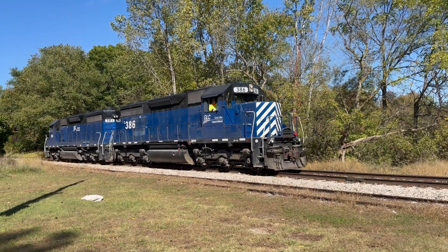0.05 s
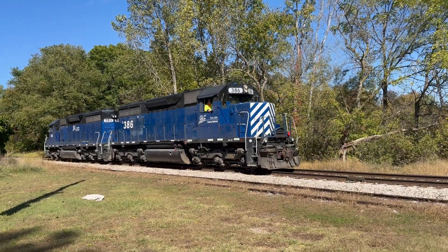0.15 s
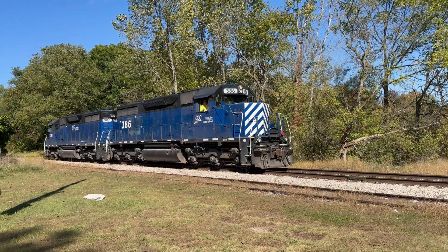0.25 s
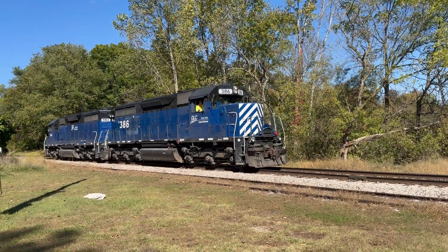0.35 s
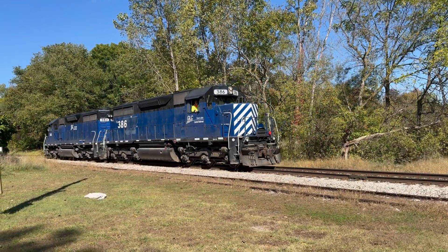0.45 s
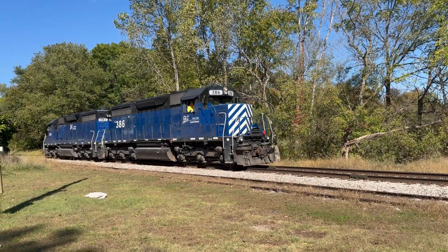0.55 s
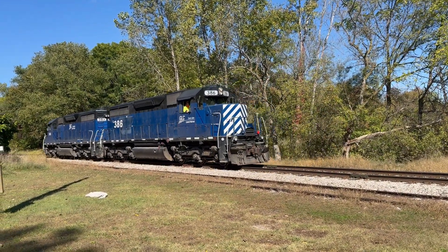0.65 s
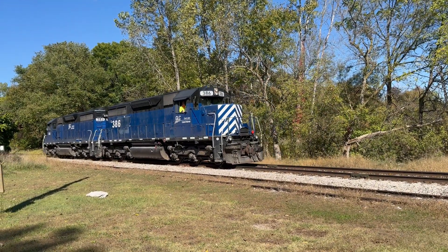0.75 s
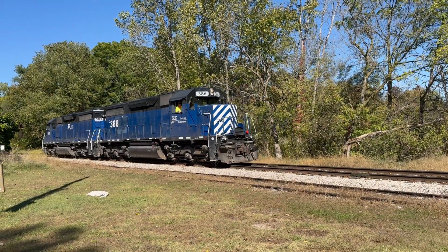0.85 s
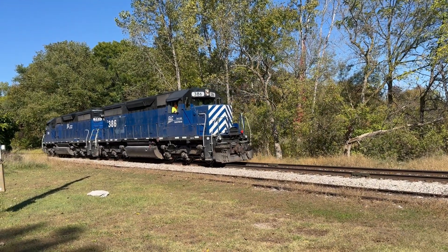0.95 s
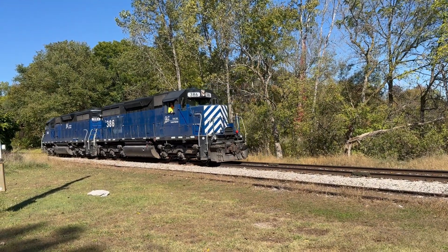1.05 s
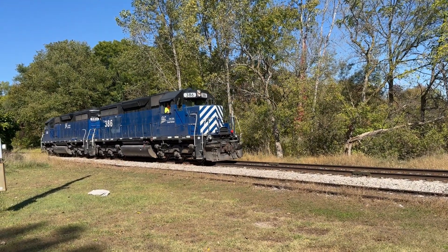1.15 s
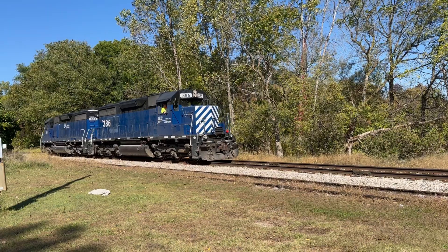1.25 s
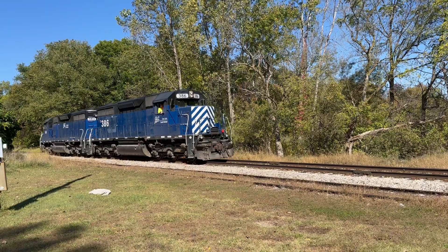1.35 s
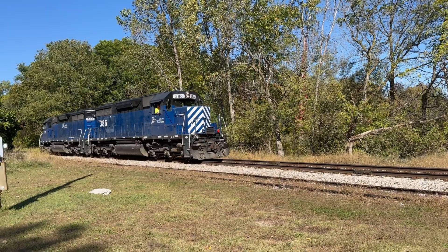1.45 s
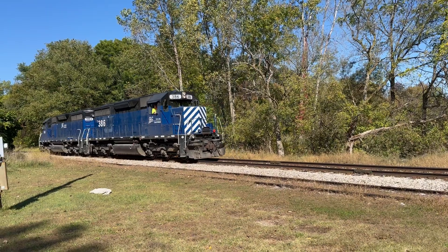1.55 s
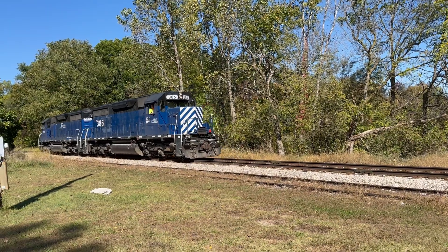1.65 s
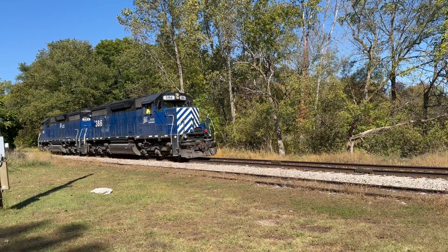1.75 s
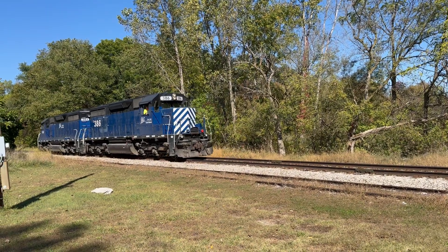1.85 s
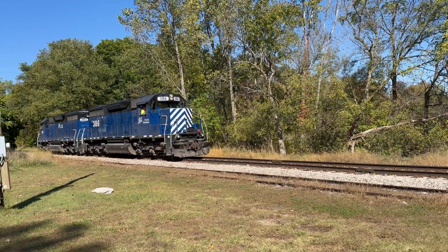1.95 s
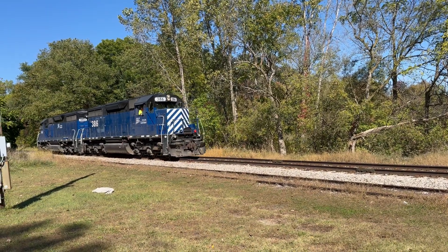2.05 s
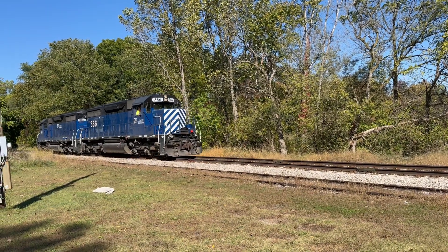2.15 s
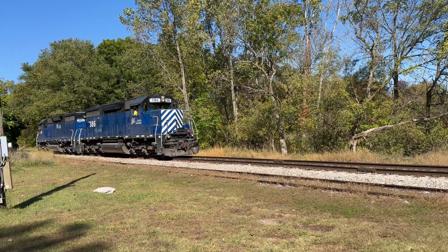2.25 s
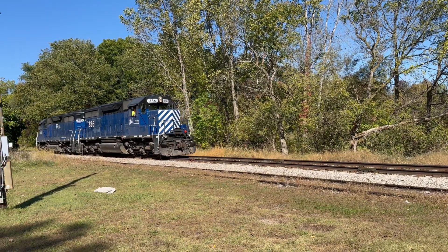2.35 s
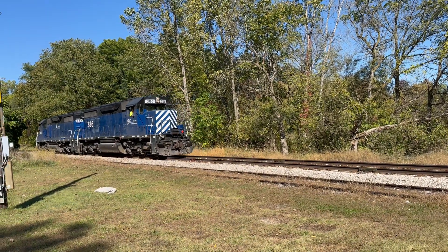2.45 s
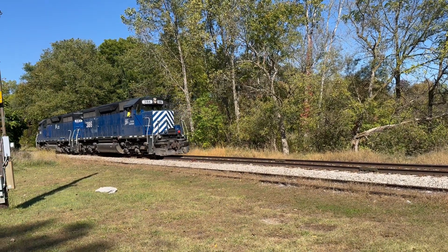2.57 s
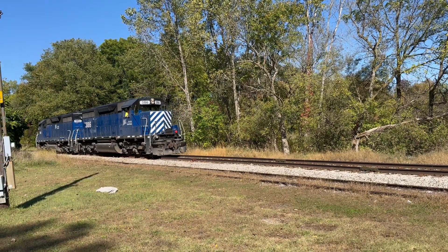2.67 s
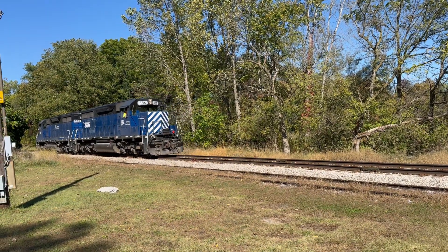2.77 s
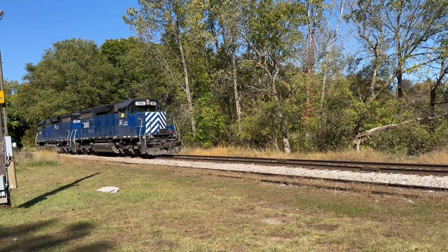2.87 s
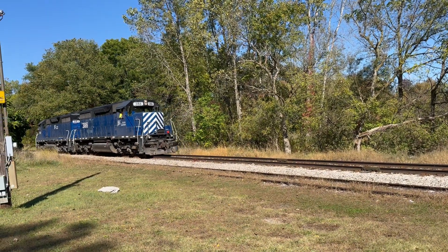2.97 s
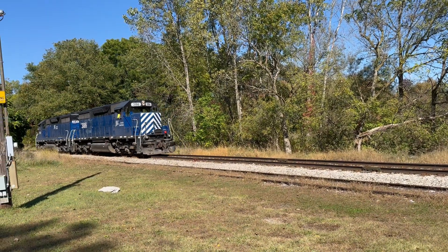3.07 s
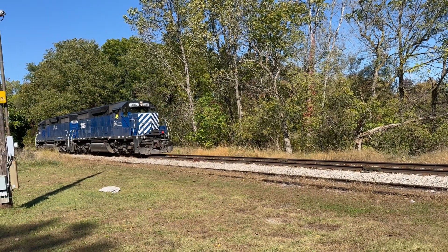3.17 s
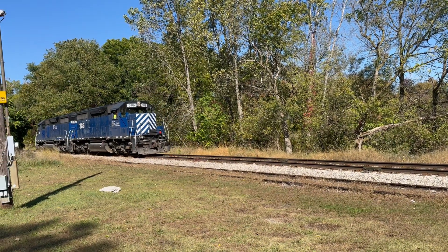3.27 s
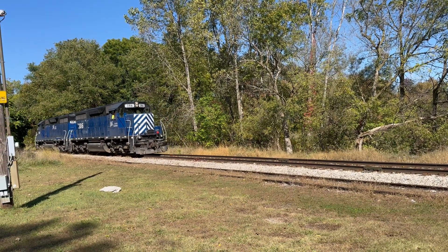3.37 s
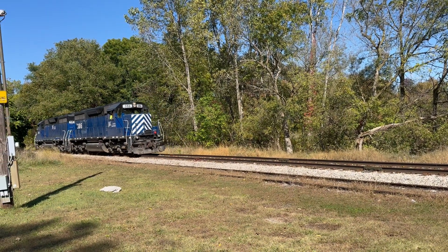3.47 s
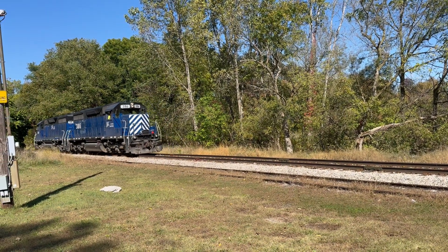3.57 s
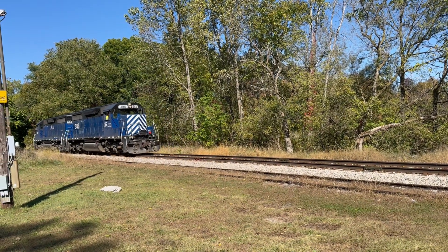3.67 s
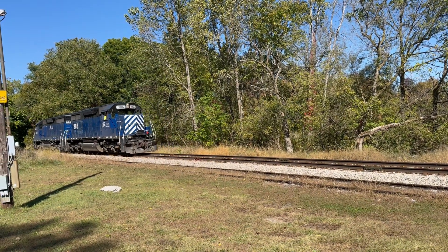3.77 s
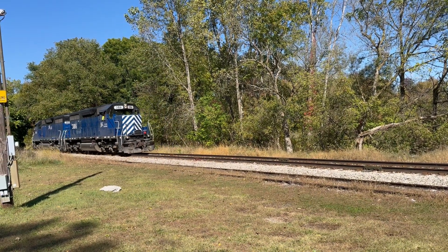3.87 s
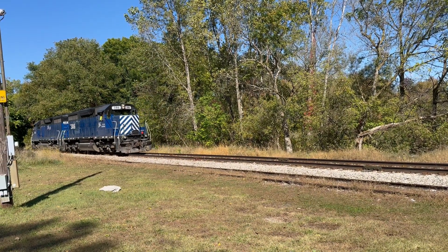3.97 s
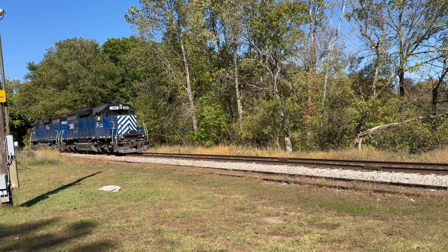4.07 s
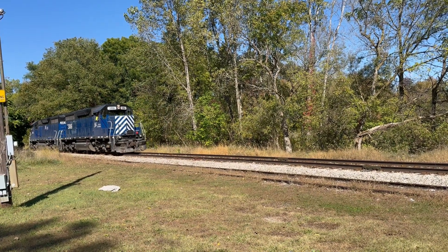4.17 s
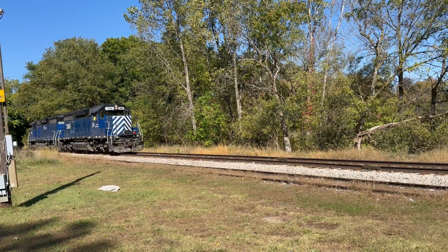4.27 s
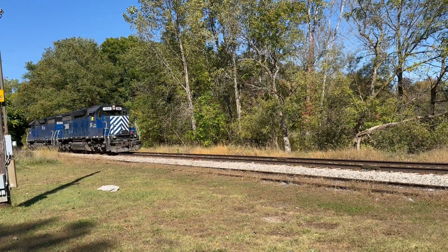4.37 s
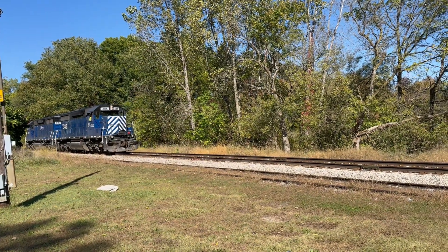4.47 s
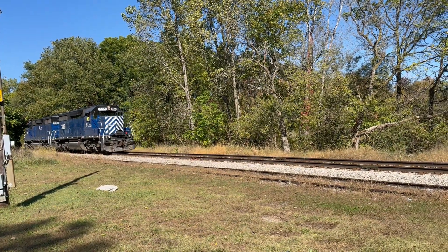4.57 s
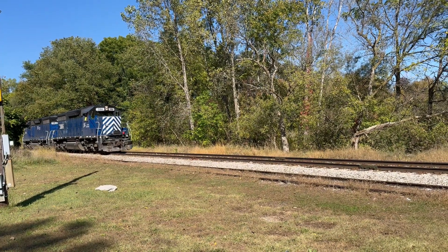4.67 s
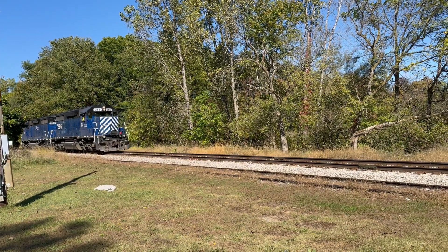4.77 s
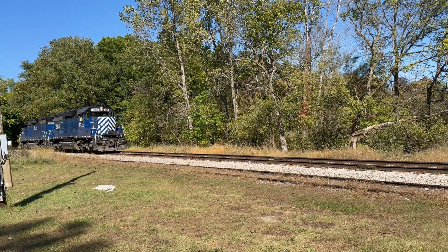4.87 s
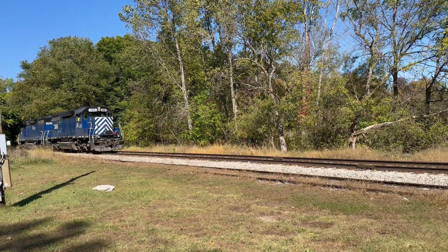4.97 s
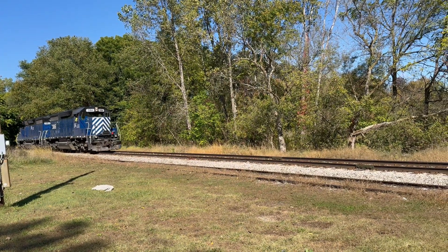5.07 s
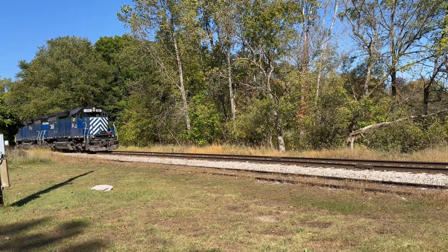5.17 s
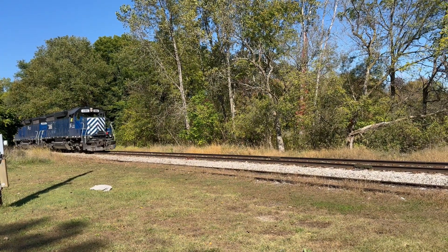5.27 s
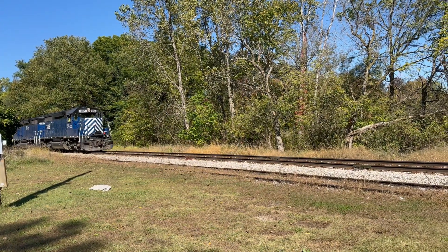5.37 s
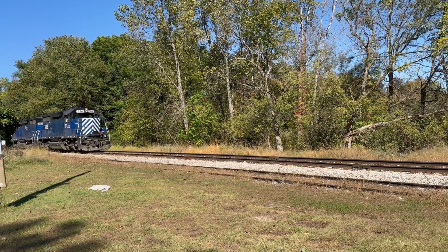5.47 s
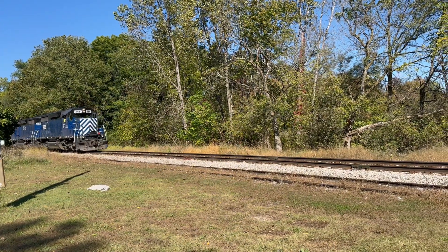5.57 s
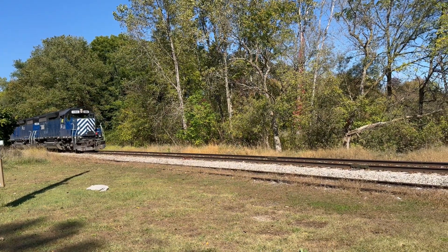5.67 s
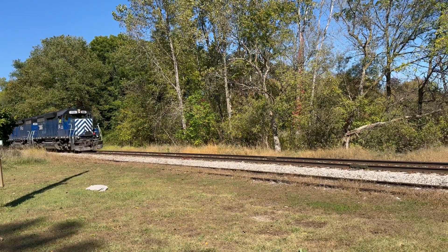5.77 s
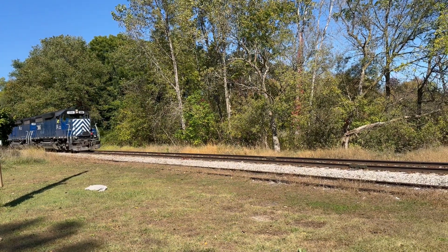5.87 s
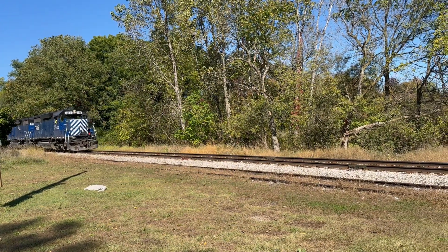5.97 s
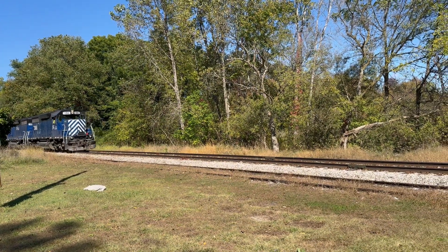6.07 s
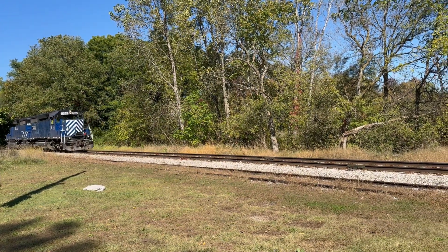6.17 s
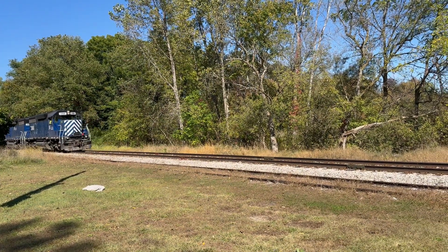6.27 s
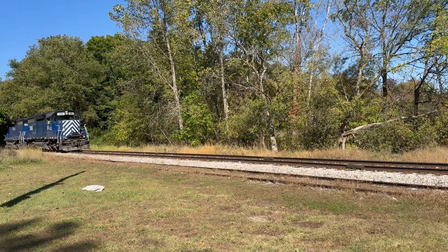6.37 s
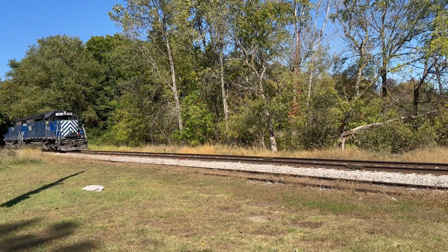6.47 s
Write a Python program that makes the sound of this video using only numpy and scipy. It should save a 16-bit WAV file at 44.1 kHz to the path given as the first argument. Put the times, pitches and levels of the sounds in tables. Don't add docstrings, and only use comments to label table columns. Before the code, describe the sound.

At the trackside, a wide stereo microphone hears a pair of diesel engines running down as they leave. The heavy bass chug and humming panels dominate first, with hiss and a high whistling turbo descending. Near the middle the roar dips briefly, then a steadier, quieter idle throb continues. Rubbing wheels, thin rail ringing and late tiny high squeaks and ticks punctuate the receding rumble, dry and open.

```python
import sys
import numpy as np
from scipy import signal
from scipy.fft import next_fast_len
from scipy.io import wavfile
from scipy.ndimage import uniform_filter1d

SR = 44100
rng = np.random.default_rng(int(sys.argv[2]) if len(sys.argv) > 2 else 0)


def elevation(decibels):
    levels = np.asarray(decibels, float)
    return 10 ** (levels / 20)


def transcribe(signal):
    frames = np.atleast_2d(signal).T
    limited = np.clip(frames, -1, 1)
    pcm = np.round(limited * 32767).astype(np.int16)
    wavfile.write(sys.argv[1], SR, pcm)


N = 287532
T = np.arange(N) / SR
RECEDE_PER_S = 0.48
REFUEL_S, REFUEL_OVER_S = 3.1, .24


def evened(x):
    return x / np.sqrt(np.mean(abs(x) ** 2) + 1e-20)


def read(points, hz):
    f, value = np.transpose(points)
    return np.interp(np.log(hz + 1), np.log(f + 1), value)


def curve(rows, column, at):
    rows = np.asarray(rows)
    return np.interp(at, rows[:, 0], rows[:, column])


def distance_db(t):
    return -20 * np.log10(1 + RECEDE_PER_S * t)


def idling(t):
    return 1 / (1 + np.exp((REFUEL_S - t) / REFUEL_OVER_S))


# frequency in Hz, lead in radians.
PORT_LEAD = [(0, 0), (500, 0.48), (950, 0.5), (1290, 1.61), (1980, 5), (2580, 7.5), (3530, 9.5),
             (4570, 13.5), (6120, 14), (6980, 14.5), (7600, 13.5), (10000, 16.5), (12000, 16.5),
             (16000, 18.5)]
# frequency in Hz, left minus right in dB.
PORT_BALANCE = [(60, -0.5), (130, 0.5), (290, -0.5), (640, 1.5), (1410, -1), (3090, 2.5), (6800, 1.5)]


def right_port(hz):
    return np.exp(-1j * curve(PORT_LEAD, 1, hz)) / elevation(read(PORT_BALANCE, hz))


def partly_same(left, other, same):
    same = np.clip(same, 0, 1)
    return same * left + np.sqrt(1 - same ** 2) * other


def flutter(width_hz, size):
    z = rng.standard_normal((2, size)) + 1j * rng.standard_normal((2, size))
    hz = np.fft.fftfreq(size, 1 / SR)
    return evened(np.fft.ifft(z * np.exp(-(2 * hz / width_hz) ** 4)))


def whistle(hz, sway, same):
    angle = 2 * np.pi * np.cumsum(hz * np.ones(sway.shape[1])) / SR
    right = partly_same(sway[0], sway[1], same) * right_port(hz)
    return np.sqrt(2) * (np.array([sway[0], right]) * np.exp(1j * angle)).real


# frequency in Hz, level in dB.
NEAR_ROAR = [(30, -31.5), (42, 1.5), (90, 13.5), (130, 4), (230, -1.5), (275, 2.5), (310, -6), (640, -1),
             (800, -9), (1200, -11.5), (1700, -13), (2400, -27.5), (3500, -40)]
# frequency in Hz, level in dB.
FAR_ROAR = [(30, -29.5), (42, 6), (80, 6), (105, 13.5), (130, 12), (270, 3.5), (310, -2.5), (640, -3),
            (1000, -11), (1480, -11.5), (1560, -15.5), (2400, -24.5), (3500, -43)]


def roar_power(hz, t):
    far = np.clip(distance_db(t) / -13.5, 0, 1)
    color_db = (1 - far) * read(NEAR_ROAR, hz) + far * read(FAR_ROAR, hz)
    lull_db = -2.5 * np.exp(-((t - 3.24) / 0.26) ** 2)
    return elevation(color_db - 27.5 + distance_db(t) + lull_db - 24) ** 2


# frequency in Hz, level in dB.
HISS_COLOR = [(1200, -22.5), (2000, -0.5), (3000, 3), (5000, -5.5), (7300, -9), (8000, -18), (10000, -22),
              (12500, -27), (14000, -35), (15500, -43), (16500, -60)]


def hiss_power(hz, t):
    absorbed_db = distance_db(t) * (hz / 11000) ** 2
    hiss_db = -43 + 0.8 * distance_db(t) - 31 + absorbed_db
    return elevation(read(HISS_COLOR, hz) + hiss_db) ** 2


# center in seconds, length in seconds, level in dB, brightness in dB per octave.
WHEEL_SCRAPES = [(0, 0.02, -37, 1), (0.692, 0.034, -42, -6), (1.07, 0.0086, -37.5, -6),
                 (1.2, 0.38, -41.5, 0.5), (1.567, 0.061, -39.5, -3.5), (1.65, 0.057, -42.5, -2),
                 (1.935, 0.19, -42, 2), (2.393, 0.15, -47, 5), (2.586, 0.091, -55, 4),
                 (2.97, 0.077, -67, 6), (3.24, 0.023, -47, -2), (3.646, 0.23, -49, 2.5),
                 (4.048, 0.054, -52.5, 6), (4.0, 0.9, -49, -0.5), (4.35, 0.18, -52, -1),
                 (4.78, 0.32, -50.5, 3), (5.038, 0.22, -54, 4), (5.977, 0.078, -57, 5),
                 (6.076, 0.17, -48, 1), (6.225, 0.077, -48, 2.5), (6.335, 0.18, -50.5, -1)]
# frequency in Hz, level in dB.
SCRAPE_COLOR = [(200, -17), (500, -0.5), (1500, -2), (3500, -4), (7400, -12.5), (8200, -26.5),
                (12500, -26.5), (14000, -35.5), (15500, -38.5), (16500, -60)]


def scrape_power(hz, t):
    power = 0
    for s, length, db, tilt_db in WHEEL_SCRAPES:
        swell = np.exp(-(2 * (t - s) / length) ** 4)
        tilted_db = tilt_db * np.log2((hz + 50) / 3000)
        power = power + swell * elevation(read(SCRAPE_COLOR, hz) + db - 29.5 + tilted_db) ** 2
    return power


# frequency in Hz, coherence from 0 to 1.
PORT_LIKENESS = [(60, 0.99), (250, 1), (500, 0.97), (1000, 0.75), (2000, 0.4), (4000, 0.33), (7000, 1),
                 (8500, 0.8), (15000, 0.4)]


def body_and_rail_noise():
    frames = N // 256 + 5
    hz = np.fft.rfftfreq(1024, 1 / SR)[:, None]
    t = np.arange(frames) * 256 / SR
    a, b, c, d, patches = rng.standard_normal((frames, 513, 5)).T
    patches = evened(uniform_filter1d(uniform_filter1d(patches, 10, 0), 14, 1))
    flicker = evened(uniform_filter1d(rng.standard_normal(frames), 5))
    power = roar_power(hz, t) + hiss_power(hz, t) + scrape_power(hz, t)
    left = a + 1j * b
    right = right_port(hz) * partly_same(left, c + 1j * d, read(PORT_LIKENESS, hz))
    z = np.array([left, right])
    z *= np.sqrt(power * SR / 1024) * elevation(1.45 * patches + 0.33 * flicker)
    noise = signal.istft(z, nperseg=1024, noverlap=768)[1][:, :N]
    return signal.sosfilt(signal.butter(5, 40, "high", fs=SR, output="sos"), noise)


# frequency in Hz, width in Hz, level at the start in dB, slope in dB per second.
HOOD_PANELS = [(95, 9, -28, -1.5), (135, 20, -30, -14), (185, 19, -37, -1.5), (275, 32, -33, -6),
               (371, 28, -40, -5), (650, 40, -42, -6), (2250, 28, -47, -11), (470, 25, -42, -5)]


def panels():
    size = next_fast_len(N)
    out = np.zeros((2, N))
    for hz, width_hz, db, slope_db in HOOD_PANELS:
        out += elevation(db + slope_db * T) * whistle(hz, flutter(width_hz, size)[:, :N], same=1.0)
    return np.sqrt(1 - idling(T)) * out


# center in seconds, length in seconds, frequency in Hz, width in Hz, level in dB.
WHEEL_RINGS = [(3.75, 0.45, 955, 50, -46), (3.95, .95, 2430, 70, -53), (3.85, .7, 2900, 120, -53),
               (1.562, .055, 430, 260, -29), (4.82, .2, 1120, 60, -45), (6.21, .05, 3900, 12, -45),
               (6.252, 0.045, 3880, 12, -45), (1.28, .35, 2451, 30, -52), (1.163, .18, 2720, 50, -52),
               (.3, 0.71, 1500, 30, -54), (1.9, .2, 8300, 500, -60), (1.93, .2, 7400, 150, -54),
               (4.35, 0.28, 7150, 350, -54), (4.373, .2, 5000, 700, -53), (4.92, 0.3, 2280, 160, -56),
               (4.15, 0.37, 797, 50, -51), (4.92, .06, 5500, 200, -54), (3.24, .03, 3200, 300, -50),
               (0.62, 0.4, 4230, 90, -54), (2.39, .12, 6000, 1300, -50), (2.86, .15, 240, 120, -35),
               (5.8, .2, 450, 150, -42)]
# center in seconds, frequency in Hz, level in dB.
FLANGE_TICKS = [(.002, 12100, -45), (6.196, 8200, -48), (6.207, 7620, -53), (6.22, 7970, -50),
                (6.23, 8650, -44), (6.253, 6800, -46)]


def wheels():
    out = np.zeros((2, N + 3 * SR))
    ticks = [(s, .008, hz, 900, db) for s, hz, db in FLANGE_TICKS]
    for s, length, hz, width_hz, db in WHEEL_RINGS + ticks:
        size = round(length * SR)
        start = round(max(s - length / 2, 0) * SR)
        tone = whistle(hz, evened(flutter(width_hz, 3 * SR)[:, :size]), same=1.0)
        out[:, start:start + size] += elevation(db) * signal.windows.tukey(size, .6) * tone
    return out[:, :N]


# time in seconds, blade tone in Hz.
BLADE_TONE = [(0, 6960), (1, 6270), (2, 5530), (3, 4860), (3.5, 4570), (4, 4410), (4.5, 4358), (5.2, 4378),
              (6, 4420), (6.52, 4405)]
# time in seconds, blade tone level in dB.
BLADE_LEVEL = [(0, -42.5), (.9, -43), (1.6, -48), (2, -45), (2.7, -48), (3.8, -49), (4.4, -46.5),
               (5.2, -46.5), (6, -45), (6.52, -45.5)]
# share of the core line, width in Hz, level running down in dB, at idle in dB.
GEAR_LINES = [(.3375, 30, -20, -6.5), (.669, 90, -13, -10)]


def turbochargers():
    hz, level_db = curve(BLADE_TONE, 1, T), curve(BLADE_LEVEL, 1, T)
    size = next_fast_len(N)
    width = 175 + .2 * np.maximum(hz - 4360, 0)
    clock = np.cumsum(width) / (2 * width.max())
    octave_db = np.maximum(-9.5 - 3.5 * T, -20.5)
    out = np.zeros((2, N))
    for order, db in ((1, 0), (2, octave_db)):
        wander = flutter(2 * width.max(), size)
        sway = np.array([np.interp(order * clock, np.arange(size), z) for z in wander])
        out += elevation(level_db + db) * whistle(order * hz, sway, same=0.61)
    out += elevation(level_db - 9) * whistle(hz, flutter(700, size)[:, :N], same=0.6)
    core = hz - .36 * width
    out += elevation(level_db - 10.5) * whistle(core, flutter(70, size)[:, :N], same=0.99)
    for share, width_hz, fast_db, idle_db in GEAR_LINES:
        db = fast_db + (idle_db - fast_db) * idling(T)
        out += elevation(level_db + db) * whistle(share * core, flutter(width_hz, size)[:, :N], same=0.67)
    return out


# time in seconds, near engine in turns per second, far engine in turns per second.
CRANK_SPEEDS = [(0, 8.354, 8.076), (.5, 7.97, 7.656), (1.6, 6.905, 6.652), (3.3, 5.412, 5.394),
                (3.9, 5.091, 4.981), (4.4, 5.026, 4.975), (4.9, 5.041, 5.076), (5.4, 5.089, 5.106),
                (5.9, 5.132, 5.094), (6.52, 5.188, 5.085)]
FIRST_ANGLES = (.17, .3175)
# multiple of crank speed, number of its level group,
# level in dB, lag between the banks in quarter cycles.
CRANK_ORDERS = [(6, 3, -8, 2), (7, 3, -6, 1), (8, 1, 1, 0), (9, 2, 1, 0), (10, 3, -1, 2.5), (11, 3, 0, .5),
                (12, 3, -4, .5), (13, 3, -2, -1), (14, 3, -8, 2), (15, 4, 0, -.5), (16, 4, -6, .5),
                (17, 4, -1, -.5), (19, 4, -7, 2), (20, 4, -10, -1)]
# level at the start in dB, slope running down in dB per second, level at idle in dB.
ORDER_GROUPS = [
    (-14.3, -3.1, -39),
    (-19, -3.7, -36),
    (-32, .8, -34),
    (-38, .1, -22.8),
]
# frequency in Hz, level in dB.
STACK_RESPONSE = [(20, -30), (38, -6), (44, 0), (88, 0), (94, -8), (120, -8), (200, -12)]


def exhausts():
    out = np.zeros((2, N))
    idle = idling(T)
    gains = []
    for db, slope_db, idle_db in ORDER_GROUPS:
        running_power = (1 - idle) * elevation(db + slope_db * T) ** 2
        gains.append(np.sqrt(running_power + idle * elevation(idle_db) ** 2))
    hidden_db = -10 + 7.5 * np.exp(-T / 1.9)
    for engine in (0, 1):
        speed = curve(CRANK_SPEEDS, 1 + engine, T)
        turns = FIRST_ANGLES[engine] + np.cumsum(speed) / SR
        for order, group, db, quarters in CRANK_ORDERS:
            hz = order * speed
            far_db = hidden_db - 5 * (order == 9)
            level = gains[group - 1] * elevation(db + read(STACK_RESPONSE, hz) + engine * far_db)
            late = [[0], [1]] * curve(PORT_LEAD, 1, hz)
            cycles = order * turns + .9 - quarters / 4
            out += np.sqrt(2) * level * np.cos(2 * np.pi * cycles - late)
    return out


def scene():
    return body_and_rail_noise() + panels() + wheels() + turbochargers() + exhausts()


def top_cut(x):
    return signal.sosfilt(signal.butter(12, 15760, fs=SR, output="sos"), x)


def record(dry):
    return top_cut(dry)


dry = scene()
out = record(dry)
transcribe(out)
```